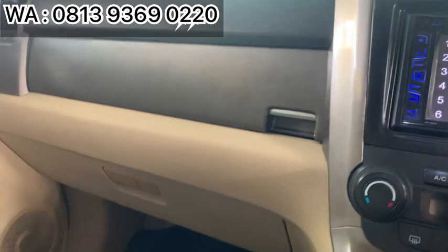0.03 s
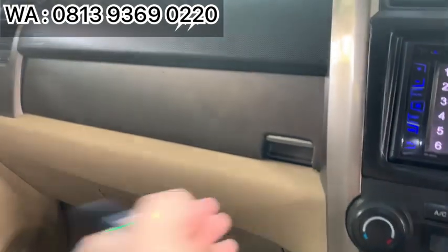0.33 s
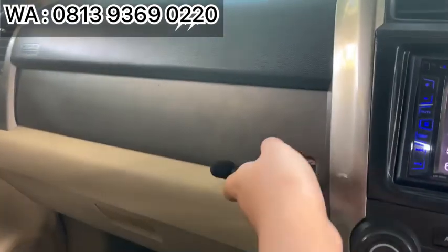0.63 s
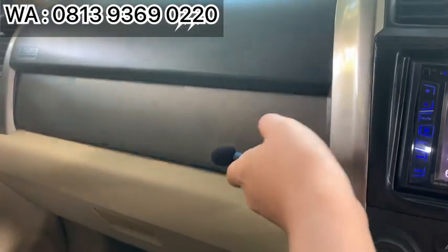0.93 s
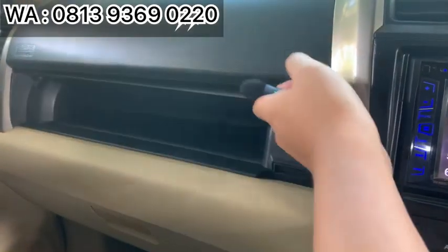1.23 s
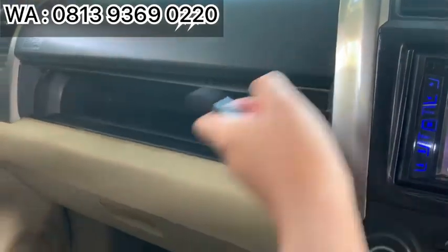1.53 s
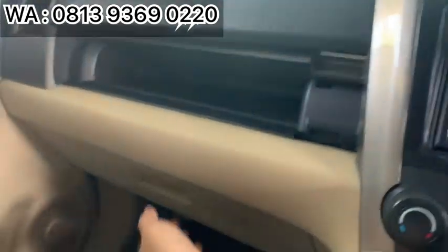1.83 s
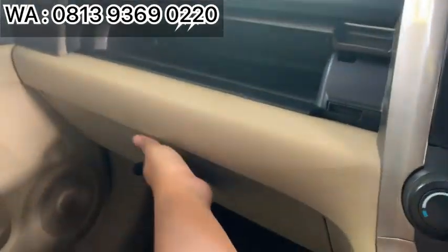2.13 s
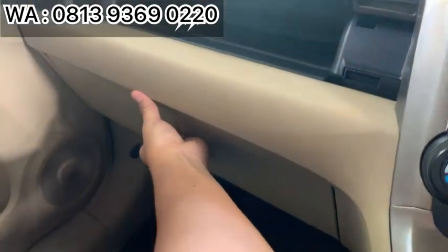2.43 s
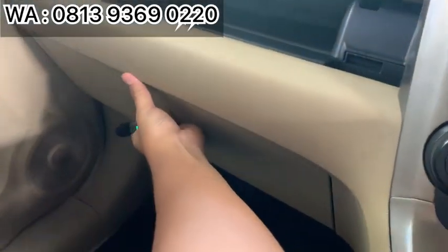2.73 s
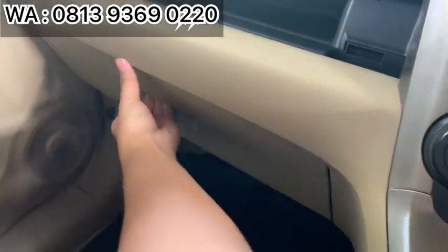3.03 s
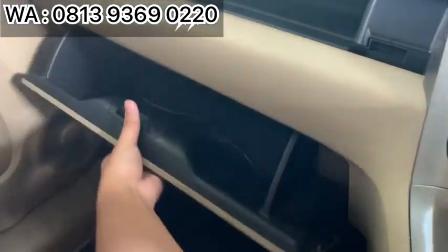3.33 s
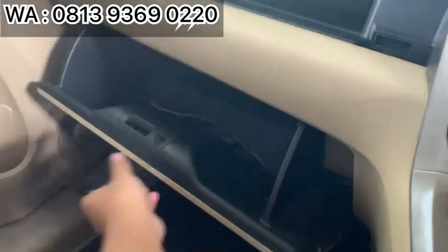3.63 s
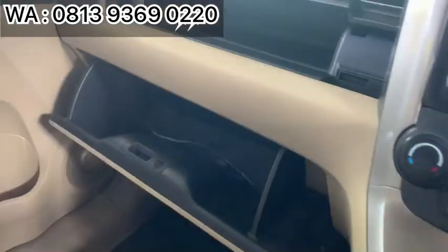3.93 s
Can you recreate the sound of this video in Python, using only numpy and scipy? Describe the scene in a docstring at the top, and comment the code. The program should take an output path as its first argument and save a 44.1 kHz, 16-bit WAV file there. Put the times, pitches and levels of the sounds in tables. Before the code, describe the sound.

Plastic glove boxes open close by in a parked car, over a low drone and faint vent hiss. Small ticks come first, then a button clicks at 0.7 seconds. The upper lid knocks open lightly from 1 to 1.5. A soft brush and handle ticks follow from 2 to 2.9. At 3.2 the lower latch snaps loudest, and the bin drops with a hollow clunk, rattling until 3.6.

```python
"""Two plastic glove boxes are opened by hand inside a parked car. A thumb clicks the button of
the upper one, and its lid unlatches and swings up to its stop. The hand then grips the lower
handle: the latch snaps, and the bin drops open, bounces and rattles. Each knock makes the plastic
ring, and sliding parts rub. Small dry ticks and creaks sound close by, over the cabin's low
drone and a faint vent hiss."""
import sys
import numpy as np
from scipy.fft import rfft, irfft, next_fast_len
from scipy.io import wavfile
from scipy.ndimage import map_coordinates

SR = 44100
rng = np.random.default_rng(int(sys.argv[2]) if len(sys.argv) > 2 else 0)


def to_wav(sig):
    """Store sig (one row per channel, or 1-D mono) as 16-bit WAV at the path in sys.argv[1].

    Samples outside -1..1 are clipped; the rate is SR.
    """
    pcm = np.clip(np.atleast_2d(sig), -1, 1) * 32767
    pcm = np.round(pcm).astype(np.int16)
    wavfile.write(sys.argv[1], SR, pcm.T)  # frames by channels


N = 176400

# The pitches in Hz that stand for a knock's bass, body, mid, edge and treble.
KNOCK_BANDS_HZ = [90, 450, 1500, 4500, 11000]
# Knocks of the upper lid and lower handle. Each row: start in seconds, rise in seconds, ring time
# multiplier, five relative band levels in dB, then the struck part's tone in Hz and its level in dB.
LID_AND_HANDLE_KNOCKS = [(1.049, 0.003, 0.91, -45.5, -43, -47.5, -53, -75, 746, -42),
                         (1.143, 0.005, 2, -60, -52, -56, -58, -78, 495, -44),
                         (1.161, 0.0043, 1.1, -41, -41, -35.5, -38.5, -52.5, 1454, -32),
                         (1.236, 0.0084, 1.59, -33.5, -39, -32.5, -35, -43.5, 885, -34.5),
                         (1.479, 0.0024, 1.1, -52, -51, -44.5, -59, -77, 1095, -35),
                         (1.514, 0.0031, 1.56, -52, -78, -51, -47, -50, 1865, -46),
                         (1.976, 0.0035, 1.8, -34, -56, -43.5, -41, -53, 4040, -51),
                         (2.254, 0.0028, 0.75, -40.5, -45, -37, -36, -49.5, 910, -41),
                         (2.320, 0.0014, 0.43, -42, -54.5, -48, -43, -57.5, 257, -47),
                         (2.918, 0.0025, 0.61, -39, -49.5, -30, -37, -85, 3250, -30.5)]
# The bin unlatches, drops and rattles. The rows read as above.
BIN_DROP_KNOCKS = [(3.161, .0095, 1.1, -23.5, -21, -23.5, -17.5, -17.5, 938, -17),
                   (3.2238, 0.0014, 0.7, -30, -22, -27.5, -26, -53, 78.7, -20.5),
                   (3.2245, 0.0095, 1.12, -31, -35.5, -28, -25, -34.5, 1746, -24.5),
                   (3.265, 0.0044, 0.95, -39, -39, -28, -29, -43, 2200, -25),
                   (3.284, .003, 1.9, -39.5, -58, -44.5, -43.5, -55, 3500, -42),
                   (3.305, 0.0037, 1.9, -55, -50, -42.5, -50, -51, 1670, -47),
                   (3.342, 0.0051, 0.77, -55, -42.5, -44, -48, -76, 937, -42),
                   (3.401, 0.0019, 0.81, -43, -43.5, -47.5, -35.5, -56, 1700, -39.5),
                   (3.450, 0.0062, 1.14, -37.5, -26.5, -31.5, -48, -57, 47.8, -25),
                   (3.481, 0.0034, 1.75, -37, -54, -36.5, -42, -58, 970, -35.5),
                   (3.516, .003, 1.43, -33.5, -39, -39.5, -44.5, -52, 1650, -34)]
# A ring time (t60) is how long a sound takes to fade by 60 dB.
# How a panel fades. Each row: pitch in Hz, ring time in seconds before a knock's multiplier.
PANEL_RING_TIMES = [(80, 0.14), (400, 0.11), (1500, 0.049), (5000, 0.045), (12000, 0.023)]
# The colour of the plastic. Each row: pitch in Hz, boost or cut in dB.
PLASTIC_COLOUR = [(2000, -1), (2600, -4), (3900, -2.5), (5200, -11), (6700, 1.5), (7700, -12.5), (8500, 2),
                  (9400, -10.5), (15000, -10.5)]
# The upper lid's own tones. Each row: pitch in Hz, relative level in dB, ring time in seconds.
LID_TONES = [(425, -10, 0.2), (532, -16, 0.41)]
# The hollow bin's tones. The rows read as for the lid.
BIN_TONES = [(89.4, -2.5, 0.21), (168, -5, 0.17), (326, -6, 0.15), (374, -4, 0.11), (466, -19, 0.079),
             (578, -4, 0.071), (754, 2, 0.069), (1735, -6, 0.069)]
# The button's tones. The rows read as for the lid.
BUTTON_TONES = [(1145, 2, 0.021), (1256, 0, 0.032), (1800, -7.5, 0.012), (2780, -10, 0.02),
                (3260, -7, 0.012), (6730, -12.5, 0.014)]
# The button's clicks. Each row: start in seconds, level in dB.
CLICK_EVENTS = [(0.6316, -41), (0.716, -22.5)]
# The tones in a tick. Each row: pitch in Hz, ring time in seconds.
TICK_TONES = [(620, 0.0032), (1700, 0.0058), (3850, 0.0052), (7300, 0.0046), (10600, 0.0062)]
# Small dry ticks. Each row: start in seconds, then a level in dB for each of the five tones.
TICK_EVENTS = [(0.1095, -60, -35.5, -31.5, -41, -56), (0.1311, -12.5, -21.5, -62, -54, -80),
               (.1857, -59, -22, -28.5, -38, -68), (1.206, -64, -43, -58, -48, -51),
               (1.453, -51, -46, -56, -40.5, -47.5), (2.3423, -48, -18.5, -19.5, -27, -30.5),
               (2.364, -53, -23, -15.5, -18, -44.5), (2.907, -65, -44, -37, -32, -47),
               (3.569, -43, -26, -27, -24.5, -47.5)]
# Creaks of the trim. Each row: start in seconds, level in dB.
CREAK_EVENTS = [(.563, -52.5), (.920, -53.5), (3.013, -57.5), (3.090, -49.5)]
# Plastic sliding at the lid, handle and hinges. Each row: start in seconds, length in seconds,
# level in dB, low and high ringing pitch in Hz.
RUB_EVENTS = [(1.449, 0.061, -55.5, 530, 1260), (2.476, 0.018, -55, 450, 554),
              (3.197, 0.023, -39, 1630, 1980), (3.29, 0.36, -58, 452, 890), (3.479, .11, -52, 483, 1220)]
# Where the button's guide rings. Each row: pitch in Hz, width in Hz, relative level in dB.
GUIDE_PEAKS = [(367, 47, 3), (1290, 100, -6), (2760, 110, -15)]
# Where the hollow lower panel rings. The rows read as for the guide.
PANEL_PEAKS = [(170.7, 7.1, 5.5), (269, 71, -10), (436, 35, -13), (558, 42, -16.5), (680, 32, -15),
               (813, 97, -17)]
# The vent's hiss. Each row: pitch in Hz, width in Hz, level in dB.
VENT_PEAKS = [(3410, 25, -79.5), (3546, 590, -74.5), (6190, 300, -85), (6990, 450, -84.5), (8780, 400, -89)]
# The colour of the cabin's rumble. Each row: pitch in Hz, relative level in dB.
RUMBLE_COLOUR = [(20, -6), (45, -5), (96, -15), (134, -22), (160, -21), (277, -29), (850, -39),
                 (1760, -42.5), (2900, -48.5), (3440, -45.5), (4540, -49.5), (6180, -57), (16000, -60.5)]
# How the lower drone tone swells. Each row: time in seconds, level in dB.
LOW_DRONE_LEVELS = [(0, -54.5), (2.8, -57), (3.3, -51), (3.6, -47.5)]
# The same for the higher drone tone.
HIGH_DRONE_LEVELS = [(0, -58), (1.1, -61), (1.35, -52.5), (2.6, -55), (3.2, -58.5)]


def amp(db):
    """Turn decibels into a multiplier."""
    return 10 ** (np.asarray(db) / 20)


def unit(x):
    """Scale a sound to an average strength (rms) of 1."""
    return x / np.sqrt(np.mean(x ** 2) + 1e-20)


def along(points, hz):
    """Read between (Hz, value) rows, with pitch spaced in octaves."""
    f, v = np.transpose(points)
    return np.interp(np.log(hz + 1), np.log(f + 1), v)


def filtered(x, response):
    """Turn each frequency f up or down by response(f)."""
    size = next_fast_len(len(x) + 4096)
    return irfft(rfft(x, size) * response(np.fft.rfftfreq(size, 1 / SR)), size)[:len(x)]


def noise(size, response):
    """Noise of strength 1, coloured by response(f)."""
    spectrum = rfft(rng.standard_normal(size)) * response(np.fft.rfftfreq(size, 1 / SR))
    return unit(irfft(spectrum, size))


def resonances(f, peaks):
    """How strongly a part with these ringing peaks answers each frequency."""
    return sum((-1) ** k * amp(db) * 1j * f * width / (hz * hz - f * f + 1j * f * width)
               for k, (hz, width, db) in enumerate(peaks))


def wobble(rate):
    """A smooth curve through `rate` random values a second."""
    return map_coordinates(rng.standard_normal(256), [np.arange(N) * rate / SR], mode="wrap")


def fade(t, t60):
    """Die away by 60 dB every t60 seconds."""
    return np.exp(-np.log(1000) * t / max(t60, 1e-4))


def ring(t, tones):
    """Pure tones that start together and fade."""
    return sum(amp(db) * np.sin(2 * np.pi * hz * t) * fade(t, t60) for hz, db, t60 in tones)


def stroke(start_s, length_s):
    """The rise and fall of one rubbing movement."""
    progress = np.clip((np.arange(N) / SR - start_s) / length_s, 0, 1)
    return np.sqrt(np.abs(np.sin(np.pi * progress)))


def add(track, start_s, sound):
    """Mix a sound into the track at its start time."""
    part = track[max(round(start_s * SR), 0):][:len(sound)]
    part += sound[:len(part)]


def cabin_drone(rumble_db=-47, low_hz=88.5, high_hz=110):
    """The cabin rumbles, with two low tones that waver in level and pitch."""
    t = np.arange(N) / SR
    out = amp(rumble_db) * noise(N, lambda f: amp(along(RUMBLE_COLOUR, f)))
    for hz, curve in ((low_hz, LOW_DRONE_LEVELS), (high_hz, HIGH_DRONE_LEVELS)):
        level = amp(np.interp(t, *np.transpose(curve)) + 0.77 * wobble(4.9))
        out += np.sqrt(2) * level * np.sin(2 * np.pi * hz * t + 0.6 * wobble(7.03))
    return out


def vent_hiss():
    """The vents hiss steadily in a few high bands."""
    return sum(amp(db) * noise(N, lambda f: 1 / (1 + ((f - hz) / width * 2) ** 2))
               for hz, width, db in VENT_PEAKS)


def ticks(slip_s=0.0035, slip_db=-4, attack_cycles=0.25):
    """Plastic slips with a little grit, then snaps and rings very briefly."""
    out, t = np.zeros(N), np.arange(1024) / SR
    for start, *levels in TICK_EVENTS:
        for (hz, t60), db in zip(TICK_TONES, levels):
            attack = 1 - np.exp(-(t * hz / attack_cycles) ** 2)  # low tones build up more slowly
            add(out, start, ring(t, [(hz, db, t60)]) * attack)
        grit = noise(len(t), lambda f: f ** 2 / (f ** 2 + 3000 ** 2) / (1 + (f / 10000) ** 4))
        shape = np.exp(-np.abs(t - slip_s) / 0.0018) * np.minimum(t / slip_s * 2, 1)
        treble_db = (levels[3] + levels[4]) / 2
        add(out, start - slip_s, amp(treble_db + slip_db) * grit * shape)
    return out


def creaks(hz=2560, t60=0.032):
    """The plastic trim gives a little, each time with a short burst of noise."""
    out, t = np.zeros(N), np.arange(2048) / SR
    for start, db in CREAK_EVENTS:
        burst = noise(len(t), lambda f: resonances(f, [(hz, hz * 2, 0)]) ** 4)
        add(out, start, amp(db) * burst * fade(t, t60))
    return out


def button(guide_db=-54.5, skin_db=-57, skin_hz=5800, crack_db=-21):
    """The thumb scrapes the button, which sings faintly in its guide and gives with a hollow click."""
    guide = amp(guide_db) * noise(N, lambda f: resonances(f, GUIDE_PEAKS))
    skin = amp(skin_db) * noise(N, lambda f: 1 / (1 + (f / skin_hz) ** 2) ** 2)
    out = (guide + skin) * stroke(start_s=0.61, length_s=0.15)
    t = np.arange(4096) / SR
    attack = 1 - np.exp(-t / 0.001)
    for start, db in CLICK_EVENTS:
        crack = noise(len(t), lambda f: f / (f + 2000) / np.sqrt(1 + (f / 4500) ** 2))
        click = ring(t, BUTTON_TONES) + amp(crack_db) * crack * fade(t, t60=0.023)
        add(out, start, amp(db) * click * attack)
    return out


def knock(t, rise, ring_scale, levels, tone_hz, tone_db, panel_db=-5):
    """A struck panel rings with so many tones that they blur into noise; one clear tone stands out."""
    swell = np.minimum(t / rise, 1) ** 2.5
    since_peak = np.maximum(t - rise, 0)
    panel = np.zeros(len(t))
    for hz in np.geomspace(45, 14500, 18):  # bands half an octave apart
        shape = swell * fade(since_peak, along(PANEL_RING_TIMES, hz) * ring_scale)
        band = shape * noise(len(t), lambda f: 1 / (1 + (4 * np.log2((f + 1) / hz)) ** 6))
        level = amp(along(list(zip(KNOCK_BANDS_HZ, levels)), hz))
        panel += level * unit(band) * np.sqrt(np.mean(shape ** 2))
    panel = filtered(panel, lambda f: amp(along(PLASTIC_COLOUR, f)))
    tone_t60 = 0.038 * (1000 / tone_hz) ** 0.65  # higher tones die sooner
    tone = swell * fade(since_peak, tone_t60) * np.sin(2 * np.pi * tone_hz * t)
    return amp(panel_db) * panel + amp(tone_db) * tone


def glove_box(knocks, tones, ring_db):
    """Each knock also sets the lid or the bin ringing with its own tones."""
    out, t = np.zeros(N), np.arange(16384) / SR
    for start, rise, ring_scale, *levels, tone_hz, tone_db in knocks:
        add(out, start, knock(t, rise, ring_scale, levels, tone_hz, tone_db))
        body_db = levels[1]
        add(out, start + rise, amp(body_db + ring_db) * ring(t, tones) * np.minimum(t / rise, 1))
    return out


def rubs(slips_per_s=550, sharpness=3.7, grit_db=-10, grit_hz=5800):
    """Plastic slides on plastic in many tiny slips that make it ring."""
    out = np.zeros(N)
    for start, length, db, low_hz, high_hz in RUB_EVENTS:
        slips = rng.standard_normal(N) * (0.17 + (rng.random(N) < slips_per_s / SR))
        peaks = [(low_hz, low_hz / sharpness, 0), (high_hz, high_hz / sharpness, -2)]
        body = filtered(slips, lambda f: resonances(f, peaks))
        grit = filtered(slips, lambda f: 1 / (1 + (f / grit_hz) ** 6))
        out += amp(db) * (unit(body) + amp(grit_db) * unit(grit)) * stroke(start, length)
    return out


def palm_brush(db=-42.5):
    """The soft palm brushes the lower panel and stirs only its low, hollow ring."""
    hollow = noise(N, lambda f: resonances(f, PANEL_PEAKS))
    return amp(db) * hollow * stroke(start_s=1.98, length_s=0.14)


def scene():
    """Everything heard from the front seat, in one channel."""
    lid = glove_box(LID_AND_HANDLE_KNOCKS, LID_TONES, ring_db=0)
    lower_bin = glove_box(BIN_DROP_KNOCKS, BIN_TONES, ring_db=-6)
    small_sounds = ticks() + button() + palm_brush() + rubs() + creaks()
    return (lid + lower_bin + small_sounds + cabin_drone() + vent_hiss())[None]


def record(dry, top_hz=16000):
    """Cut away the very highest treble."""
    return np.array([filtered(ch, lambda f: 1 / np.sqrt(1 + (f / top_hz) ** 120)) for ch in dry])


dry = scene()
out = record(dry)
to_wav(out)
```